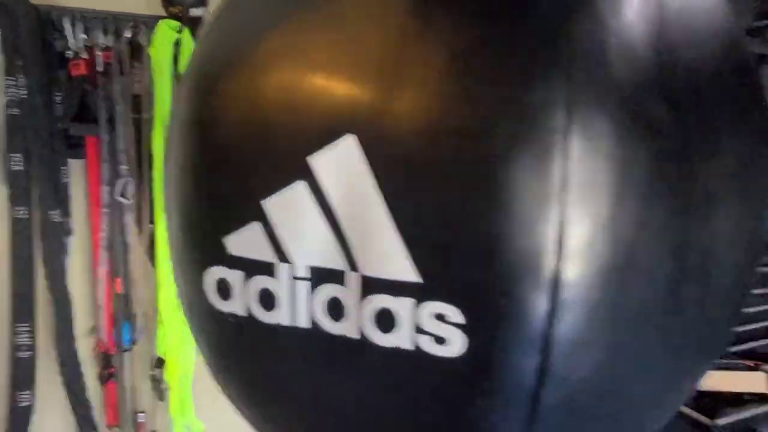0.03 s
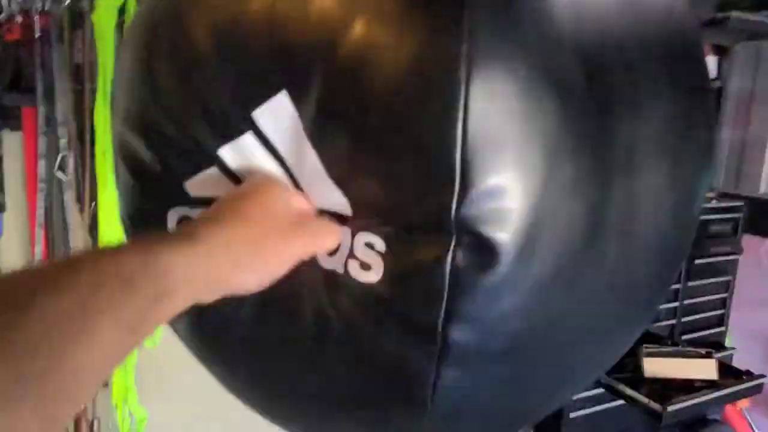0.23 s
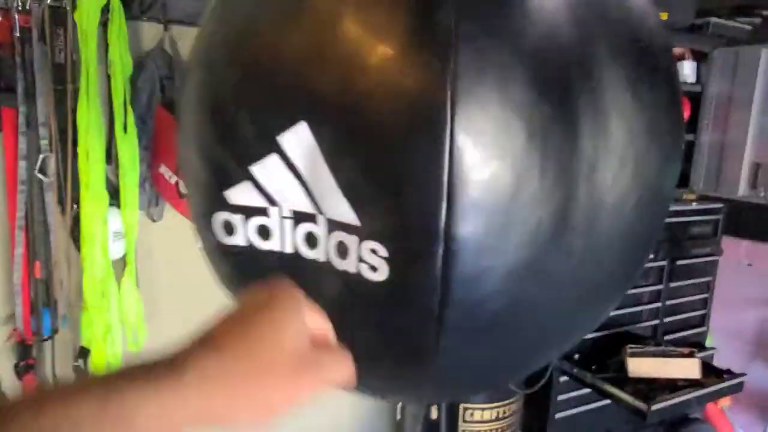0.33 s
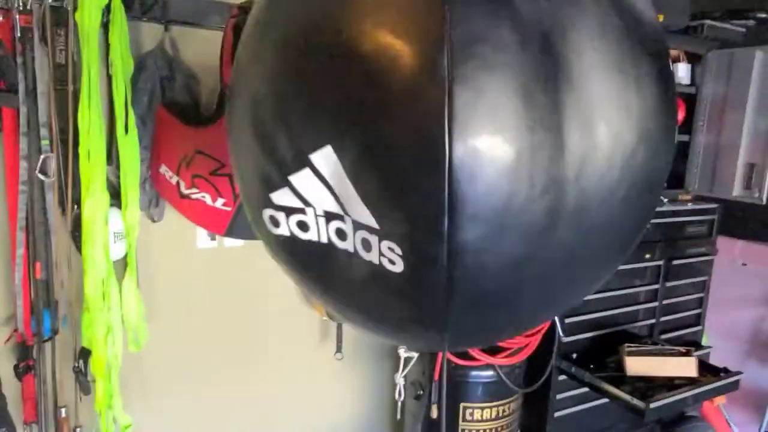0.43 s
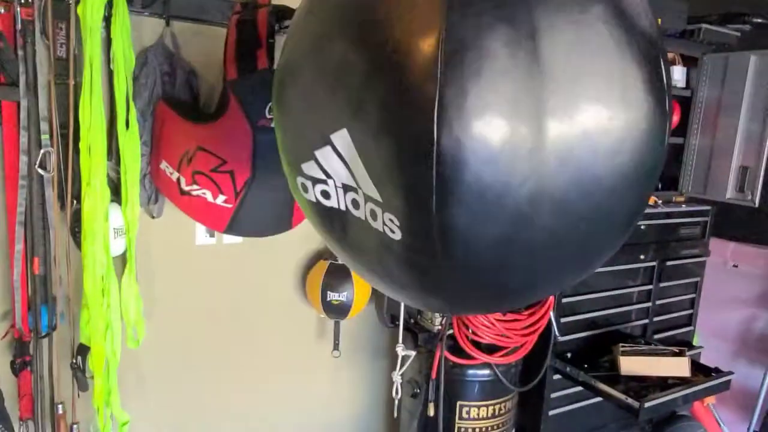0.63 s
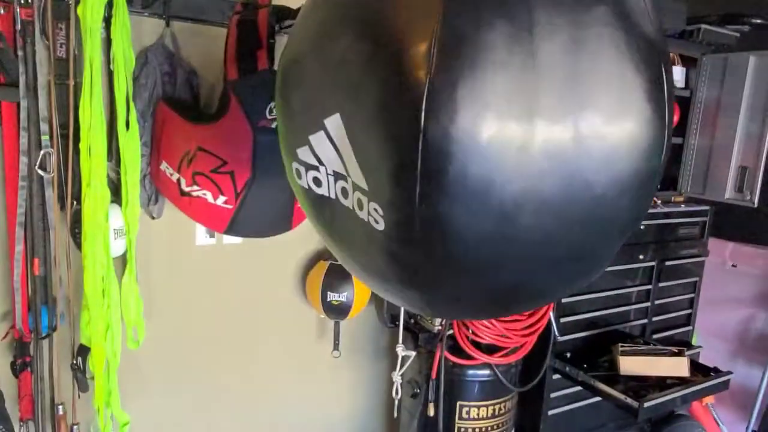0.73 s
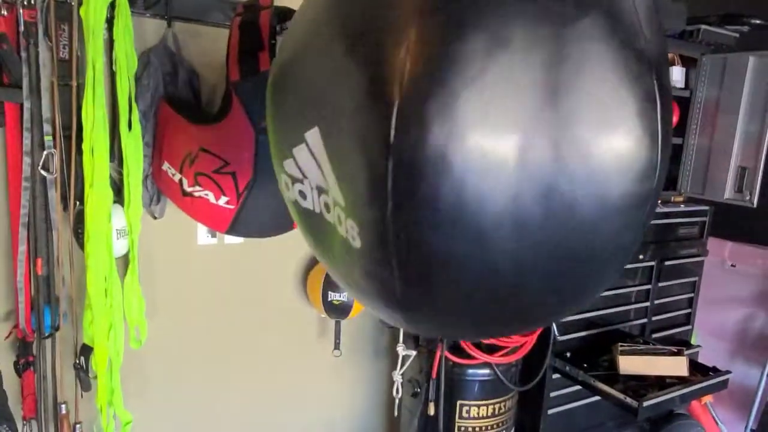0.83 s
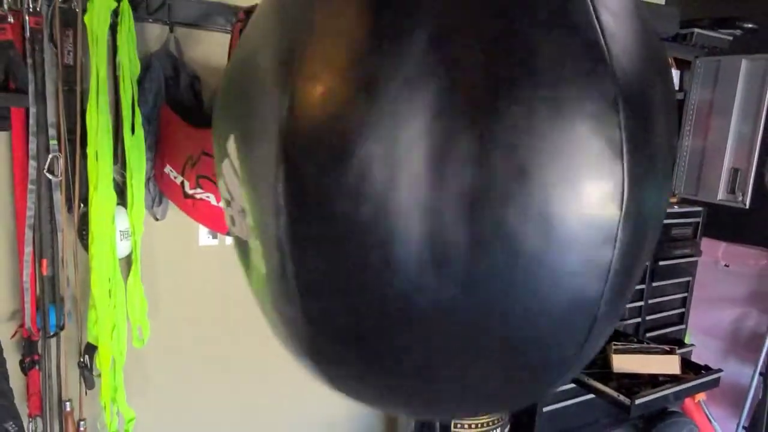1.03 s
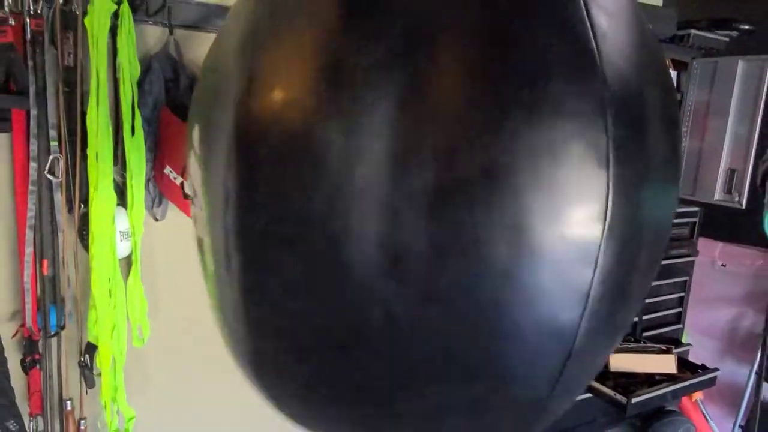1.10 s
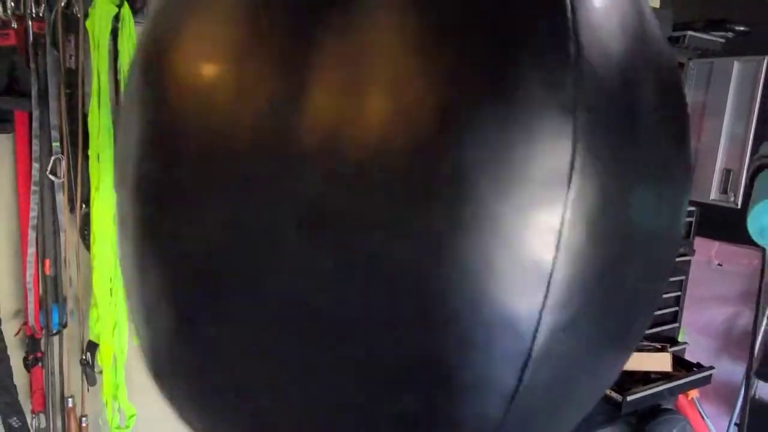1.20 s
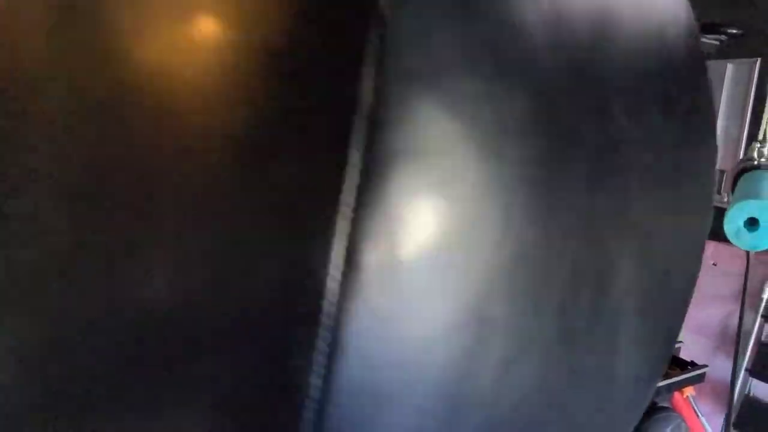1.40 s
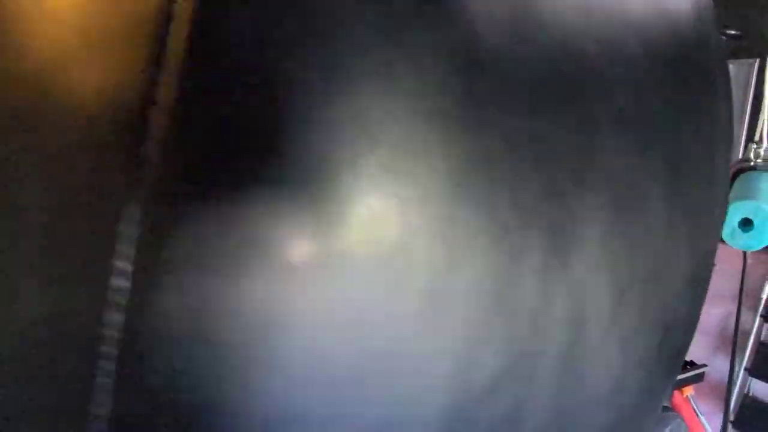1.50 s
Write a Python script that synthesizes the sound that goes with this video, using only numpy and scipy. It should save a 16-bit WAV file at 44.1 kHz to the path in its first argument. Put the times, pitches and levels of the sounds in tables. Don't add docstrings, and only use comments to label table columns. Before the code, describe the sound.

Hard punch on an inflated vinyl punching ball in a garage, then a softer palm catch

```python
import sys
import numpy as np
from scipy import signal
from scipy.fft import rfft, irfft
from scipy.io import wavfile
from scipy.ndimage import uniform_filter1d

SR = 44100
rng = np.random.default_rng(int(sys.argv[2]) if len(sys.argv) > 2 else 0)


def makeup_ratio(level_db):
    decades = np.asarray(level_db, float) / 20
    return 10 ** decades


def put_to_file(sound):
    columns = np.atleast_2d(sound).T
    safe = np.clip(columns, -1, 1)
    whole_steps = np.round(safe * 32767)
    wavfile.write(sys.argv[1], SR, whole_steps.astype(np.int16))


N = 68355
T = np.arange(N) / SR
F = np.maximum(np.fft.rfftfreq(N, 1 / SR), 1)


def on_hz(table, hz):
    table = np.array(table)
    return np.interp(np.log(hz), np.log(table[:, 0]), table[:, 1])


def unit(x):
    return x / np.sqrt(np.mean(x ** 2))


def noise(colour, grain_db=0.):
    x = rng.standard_normal(N) * makeup_ratio(grain_db * rng.exponential(size=N))
    return unit(irfft(rfft(x) * makeup_ratio(on_hz(colour, F)), N))


def walk(rate):
    k = int(SR / rate)
    steps = np.repeat(rng.standard_normal(N // k + 1), k)
    smooth = uniform_filter1d(uniform_filter1d(steps, k), k)
    return unit(smooth[:N])


def stereo(mid, side):
    return np.array([mid + side, mid - side])


def off_wall(x, share, delay):
    return stereo(x, -share * np.roll(x, delay))


def bands(x, gain):
    spec, out = rfft(x), 0
    for hz in 25 * 2 ** np.arange(0, 10, .5):
        share = np.cos(np.pi * np.clip(np.log2(F / hz), -.5, .5)) ** 2
        out = out + irfft(spec * share, N) * gain(hz)
    return out


def modes(table, start, rise, hold):
    out = 0
    for hz, db, t60 in table:
        short = rise * min(1, table[0][0] / hz)
        age = T - start - 1.022 * (rise - short)
        swell = np.clip(age / short, 0, 1) ** 1.1
        free = np.maximum(age - short - hold * short / rise, 0)
        fade = makeup_ratio(-60 * free / t60)
        out = out - makeup_ratio(db) * swell * fade * np.sin(2 * np.pi * hz * np.maximum(age, 0))
    return out


def rub(curve, sound):
    curve = np.array(curve)
    level_db = np.interp(T, curve[:, 0], curve[:, 1], right=-150)
    return sound * makeup_ratio(level_db + 1.2 * walk(60))


# frequency in Hz, density in dB.
HUM_COLOUR = [(15, -14), (40, -12.5), (80, 7), (120, -12), (158, -5.5), (330, -16.5), (1500, -34),
              (8000, -44), (16000, -46)]
# frequency in Hz, density in dB.
HUM_SIDE_COLOUR = [(15, -30.5), (80, -2.5), (212, -11.5), (476, -11.5), (960, -13), (3000, -25),
                   (16000, -30)]


def garage_hum():
    def flicker(hz):
        return makeup_ratio(2.4 * min(1, (1500 / hz) ** .5) * walk(27))

    mid = makeup_ratio(-52.5) * bands(noise(HUM_COLOUR), flicker)
    side = makeup_ratio(-62.5) * bands(noise(HUM_SIDE_COLOUR), flicker)
    return stereo(mid, side)


# start in
# seconds, peak in dB, brightest frequency in Hz.
SEAM_TICKS = [(0.145, -44.5, 4930), (.221, -39, 5200), (.246, -32, 6300), (.268, -27.5, 5600),
              (.292, -29, 5100), (1.056, -61, 2960), (1.272, -60.5, 2750), (1.283, -55.5, 900),
              (1.2999, -49, 750), (1.391, -44, 2900), (1.496, -53.5, 8000), (1.549, -50.5, 7780)]


def seam_ticks():
    out = 0
    for start, db, hz in SEAM_TICKS:
        age = T - start
        click = noise([(100, -30), (hz / 3, -6), (hz, 0), (hz * 1.55, -10), (20000, -40)])
        fade = (age > 0) * np.exp(-np.maximum(age, 0) / .003)
        out = out + makeup_ratio(db) * fade * click
    return stereo(out, -.3 * out)


# frequency in Hz, level in dB, t60 in seconds.
CHAIN_LINKS = [(2880, -54, .5), (2893, -58, .4)]


def chain():
    links = modes(CHAIN_LINKS, .41, 0.0069, 0.014)
    wobbling = links * makeup_ratio(2 * walk(27))
    return stereo(wobbling, 0.12 * wobbling)


# time in seconds, level in dB.
SLEEVE_LEVEL = [(0, -67.5), (.07, -59.5), (.098, -50.5), (.125, -48.5), (.15, -50.5), (.18, -53.5),
                (.2, -54), (.218, -48), (.228, -45), (.24, -53)]
# frequency in Hz, density in dB.
SLEEVE_COLOUR = [(300, -10.5), (880, -12.5), (1900, -6.5), (3600, -12), (4700, -13), (6500, -21.5),
                 (8000, -28), (15500, -32)]
# time in seconds, level in dB.
WEAVE_LEVEL = [(.07, -90.5), (.1, -62.5), (.145, -55), (.2, -56), (.228, -43.5), (.24, -50.5)]
# frequency in Hz, density in dB.
WEAVE_COLOUR = [(3000, -41.5), (6000, -5), (8000, -3), (15500, -7.5)]
# frequency in Hz, level in dB, t60 in seconds.
BUCKLE_MODES = [(10000, -78, .3)]


def sleeve():
    peak_hz, width_hz = 1740, 700
    whistle = [(100, -40), (peak_hz - width_hz, -25), (peak_hz, 0), (peak_hz + width_hz, -25), (20000, -60)]
    fold = makeup_ratio(0.5) * np.exp(-((T - 0.084) / 0.042) ** 2)

    def cloth():
        return noise(SLEEVE_COLOUR, grain_db=0.5) + fold * noise(whistle)

    swish = rub(SLEEVE_LEVEL, stereo(cloth(), makeup_ratio(-1.5) * cloth()))
    weave = rub(WEAVE_LEVEL, stereo(noise(WEAVE_COLOUR), makeup_ratio(5.5) * noise(WEAVE_COLOUR)))
    buckle = modes(BUCKLE_MODES, -.01, 0.0047, 0.036)
    return swish + weave + buckle


# time in seconds, level in dB.
SHIFT_LEVEL = [(1.03, -93), (1.06, -72), (1.09, -72.5), (1.13, -62), (1.18, -69), (1.23, -66)]
# frequency in Hz, density in dB.
SHIFT_COLOUR = [(200, -18.5), (550, 4.5), (900, -16), (1700, -5.5), (2500, -21), (8000, -29)]
# time in seconds, level in dB.
SCUFF_LEVEL = [(1.26, -76), (1.272, -60), (1.295, -53), (1.325, -46.5), (1.352, -57.5), (1.355, -59)]
# frequency in Hz, density in dB.
SCUFF_COLOUR = [(60, -32), (120, 1), (200, 1), (350, 1.5), (800, -12), (1200, -35), (8000, -61)]
# time in seconds, level in dB.
SKIM_LEVEL = [(1.265, -79.5), (1.275, -67.5), (1.3, -63.5), (1.32, -69.5), (1.355, -62), (1.44, -70),
              (1.49, -57), (1.55, -71)]
# frequency in Hz, density in dB.
SKIM_COLOUR = [(500, -30), (1500, 1), (2600, -1), (4000, -7.5), (7000, -14.5), (9000, -20)]


def swing_back():
    def pair(colour, side_db):
        return stereo(noise(colour, grain_db=2.5), makeup_ratio(side_db) * noise(colour))

    shift = rub(SHIFT_LEVEL, pair(SHIFT_COLOUR, -3.5))
    scuff = rub(SCUFF_LEVEL, pair(SCUFF_COLOUR, -9))
    skim = rub(SKIM_LEVEL, pair(SKIM_COLOUR, -3))
    return shift + scuff + skim


# start in seconds, frequency
# in Hz, level in dB, t60 in seconds.
SKIN_LUMPS = [(0.26, 380, -33, 0.065), (.268, 820, -32, 0.051), (.292, 245, -23, 0.37),
              (.295, 715, -34, 0.085), (.29, 440, -34, .12), (0.39, 268, -32.5, 0.15),
              (0.42, 350, -34, 0.098), (.42, 725, -42.5, 0.064), (.47, 290, -41, 0.22),
              (0.52, 240, -40.5, 0.23), (.59, 346, -48, .12), (0.2, 85, -45, .06), (0.64, 330, -58, 0.16),
              (.9, 380, -57, 0.13), (.505, 2885, -54.5, 0.092), (.236, 190.6, -25.5, .04),
              (1.306, 175, -39, 0.076), (1.295, 640, -53, .06), (1.326, 320, -43.5, 0.032),
              (1.3805, 154, -25, 0.019), (1.368, 270, -32.5, 0.037), (1.385, 300, -36, 0.075),
              (1.422, 143, -33, 0.041), (1.405, 169, -41, .05), (1.44, 290, -40.5, 0.067),
              (1.47, 158, -41, .1), (1.45, 674, -43, 0.21), (1.495, 740, -47, 0.067),
              (1.505, 250, -40, 0.11), (1.53, 46, -39, .1), (1.53, 531, -47.5, .1)]


def skin_lumps():
    rise, hold, sag = 0.014, 0.0088, .8
    out = np.zeros(N)
    for start, hz, db, t60 in SKIN_LUMPS:
        k = int(start * SR)
        age = T[k:k + SR // 4] - start
        swell = np.sin(np.pi / 2 * np.clip(age / rise, 0, 1)) ** 2
        fade = makeup_ratio(db - 60 * np.maximum(age - rise - hold, 0) / t60)
        out[k:k + SR // 4] += swell * fade * np.sin(2 * np.pi * hz * age * (1 - sag * age))
    return off_wall(out, .18, 160)


def favoured(x, peaks):
    lift_db = sum(db * np.exp(-((F - hz) / width) ** 2) for hz, width, db in peaks)
    return irfft(rfft(x) * makeup_ratio(lift_db), N)


SLAP_S = (.2292, 1.3618)
# crack in dB, crack length in seconds, echo in dB, stretch of the room's decay.
SLAPS = [
    (-11.5, 0.0048, -21, 0.96),
    (-23.5, 0.0053, -30, 0.84),
]
# frequency in Hz, density in dB.
CRACK_SIDE = [(88, -49), (250, -14), (700, 2.5), (1400, -1.5), (2300, -6), (3600, -7), (6500, -19.5),
              (8000, -34.5)]
# frequency in Hz, t60 in seconds.
ROOM_T60 = [(100, 0.87), (190, 0.69), (350, 0.74), (700, 0.63), (1600, 0.7), (5000, 0.56), (8000, 0.44),
            (14000, 0.41)]


def slap(which, crack, echo, echo_side, crack_side_db, echo_side_db, peaks):
    crack_db, length, echo_db, stretch = SLAPS[which]
    age = T - SLAP_S[which]
    burst = np.sin(np.pi * np.clip(age / length, 0, 1) ** 0.41) ** 2
    direct = makeup_ratio(crack_db) * burst * stereo(noise(crack), makeup_ratio(crack_side_db) * noise(CRACK_SIDE))
    late = np.maximum(age - 0.00044, 0)

    def ring(hz):
        build = 1 - np.exp(-late / 0.0037)
        return build * makeup_ratio(-60 * late / on_hz(ROOM_T60, hz) / stretch + 1.2 * walk(40))

    mid = bands(favoured(noise(echo), peaks), ring)
    side = makeup_ratio(echo_side_db) * bands(noise(echo_side), ring)
    return direct + makeup_ratio(echo_db) * stereo(mid, side)


# frequency in Hz, level in dB, t60 in seconds.
CATCH_MODES = [(152, -27, 0.06), (92, -38, 0.6)]
# frequency in Hz, level in dB, t60 in seconds.
PALM_MODES = [(616, -32, 0.053), (890, -32, 0.076), (1020, -28.5, 0.038), (1200, -25.5, 0.02),
              (2630, -27, 0.0037), (4250, -34, .005)]
# frequency in Hz, density in dB.
CATCH_CRACK = [(180, -34), (500, -23), (1200, 6.5), (1900, 0), (2700, 0.5), (4200, -8), (6000, -17),
               (7500, -32.5)]
# frequency in Hz, density in dB.
CATCH_ECHO = [(60, -20), (110, 0.5), (490, -8), (800, -6), (1500, -15), (2900, -9), (4600, -21),
              (8000, -44)]
# frequency in Hz, density in dB.
CATCH_SIDE = [(80, -42), (150, -18), (290, -2.5), (440, -12.5), (1000, -1), (1300, -11.5), (3000, -7),
              (8000, -39)]
# centre in Hz, width in Hz, lift in dB.
CATCH_PEAKS = [(970, 90, 2.5), (1430, 240, -5), (2900, 270, 1.5), (3640, 290, -4), (4400, 250, 3.5),
               (5200, 340, -7), (6030, 240, 4.5)]


def open_hand():
    thud = modes(CATCH_MODES, 1.363, 0.007, 0.009)
    palm = modes(PALM_MODES, 1.3622, 0.000613, 0.00029)
    crack = slap(1, CATCH_CRACK, CATCH_ECHO, CATCH_SIDE, -3, -0.5, CATCH_PEAKS)
    return off_wall(thud, .18, 160) + off_wall(palm, .2, 12) + crack


# frequency in Hz, level in dB, t60 in seconds.
TOUCH_MODES = [(107.6, -15.5, .03), (900, -30, 0.025)]
# frequency in Hz, level in dB, t60 in seconds.
PUNCH_MODES = [(59.5, -15.5, 0.82), (63.1, -38.5, 0.93), (77.5, -26.5, 0.1), (30.78, -34.5, 0.98),
               (118.3, -34, 0.44), (95.2, -32.5, 0.08)]
# frequency in Hz, level in dB, t60 in seconds.
KNOCK_MODES = [(222, -9, 0.017), (392.5, -18, 0.1), (763, -10.5, 0.02), (1306, -18, 0.019),
               (3300, -17, 0.007), (3800, -17.5, 0.00796), (5200, -17, 0.008), (5890, -24, 0.0079),
               (1040, -18, 0.0195), (246, -22.5, 0.19), (374, -35, 0.93)]
# frequency in Hz, density in dB.
PUNCH_CRACK = [(88, -14.5), (300, -17.5), (800, -16.5), (2100, -23), (3800, -16), (6500, -25),
               (8000, -27.5), (15000, -18)]
# frequency in Hz, density in dB.
PUNCH_ECHO = [(60, -24), (130, -9), (200, -6), (400, -14), (800, -17.5), (2300, -24), (6500, -26),
              (15500, -27.5)]
# frequency in Hz, density in dB.
PUNCH_SIDE = [(80, -49), (150, -27.5), (280, -9.5), (550, -10.5), (1480, -11.5), (2200, -19.5),
              (6500, -21.5), (15500, -20)]
# centre in Hz, width in Hz, lift in dB.
ROOM_PEAKS = [(715, 62, 4), (1646, 205, 3.5), (2280, 280, -2), (4750, 270, -1.5), (5200, 300, 0.5),
              (6200, 210, -2)]


def fist():
    dent = modes(TOUCH_MODES, .2255, .002, 0.00046)
    boom = modes(PUNCH_MODES, .2085, 0.0186, 0.13)
    knock = modes(KNOCK_MODES, .2305, 0.000832, 0.0018)
    crack = slap(0, PUNCH_CRACK, PUNCH_ECHO, PUNCH_SIDE, 5, 1, ROOM_PEAKS)
    return off_wall(boom - dent, .18, 160) + off_wall(knock, .2, 12) + crack


def scene():
    background = garage_hum() + seam_ticks() + chain()
    rubbing = sleeve() + swing_back()
    return background + rubbing + skin_lumps() + open_hand() + fist()


def low_pass(x):
    return signal.sosfilt(signal.butter(12, 16640, fs=SR, output="sos"), x)


# frequency in Hz, left minus right in dB.
PORTS = [(60, -0.5), (400, -1), (1200, -1), (3000, -2), (5500, -8.5), (8000, -0.5), (14000, -0.5)]
# frequency in Hz, gain in dB.
CENTRE = [(1000, -0.5), (1600, 0.5), (2250, -0.5), (3300, 1), (4250, -2), (5200, 1.5), (6000, 2.5)]
# frequency in Hz, gain in dB.
MIC = [(20, -0.5), (6600, 0), (7600, -10), (16000, -16.5), (17000, -65.5)]


def record(dry):
    tilt = on_hz(PORTS, F) / 2
    mid, side = rfft(dry[0] + dry[1]) / 2, rfft(dry[0] - dry[1]) / 2
    ports = stereo(mid * makeup_ratio(on_hz(CENTRE, F)), side)
    heard = irfft(ports * makeup_ratio(on_hz(MIC, F) + np.array([tilt, -tilt])), N)
    limit, top_hz = .98, 16600
    limited = limit * np.tanh(heard / limit)
    held = irfft(rfft(limited) * (F < top_hz), N)
    return low_pass(held)


dry = scene()
out = record(dry)
put_to_file(out)
```